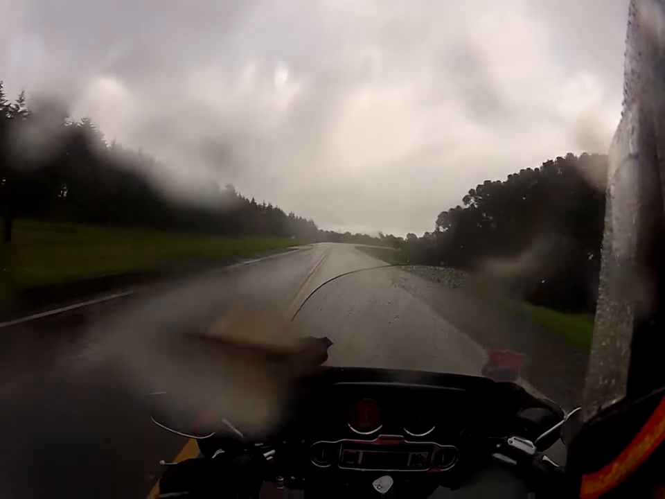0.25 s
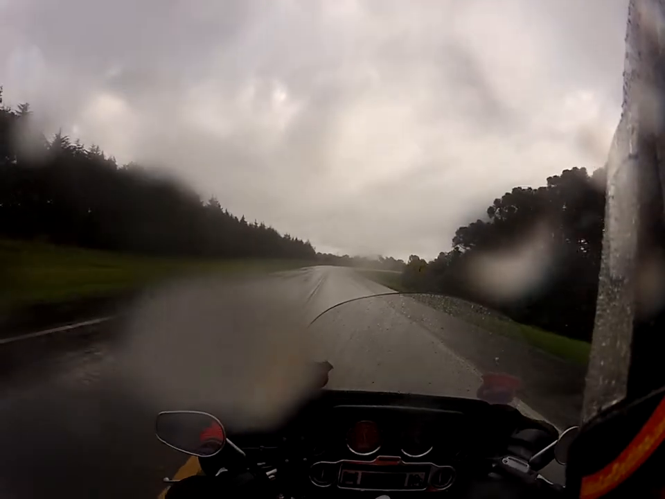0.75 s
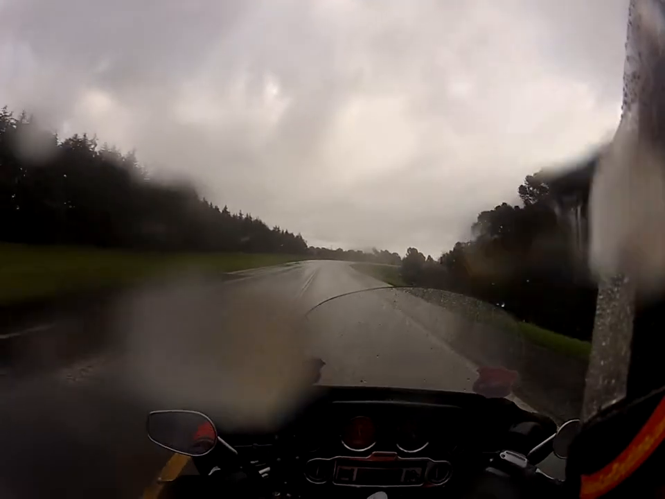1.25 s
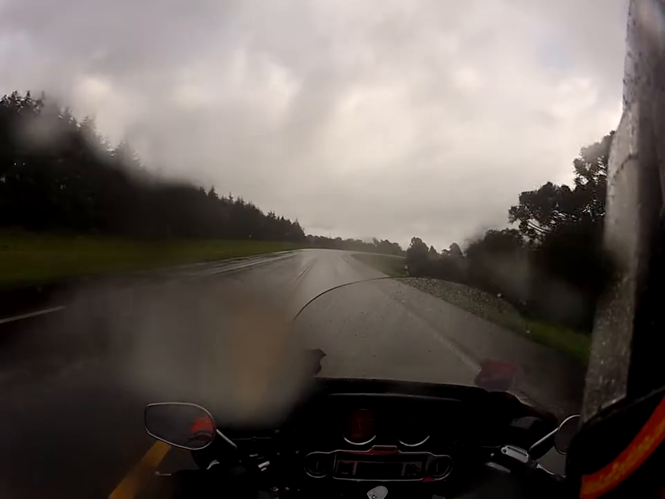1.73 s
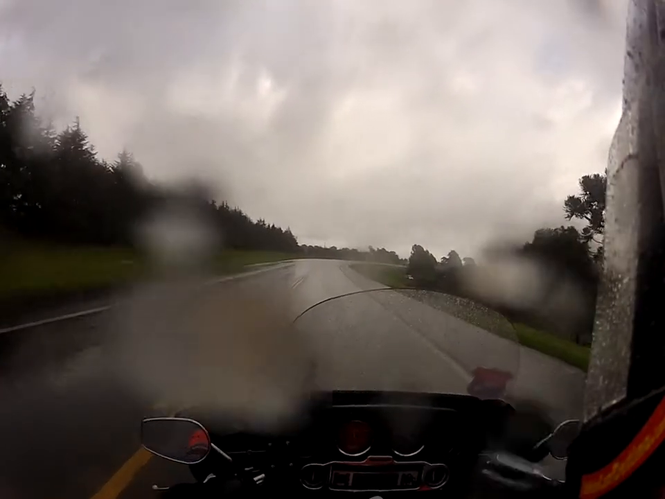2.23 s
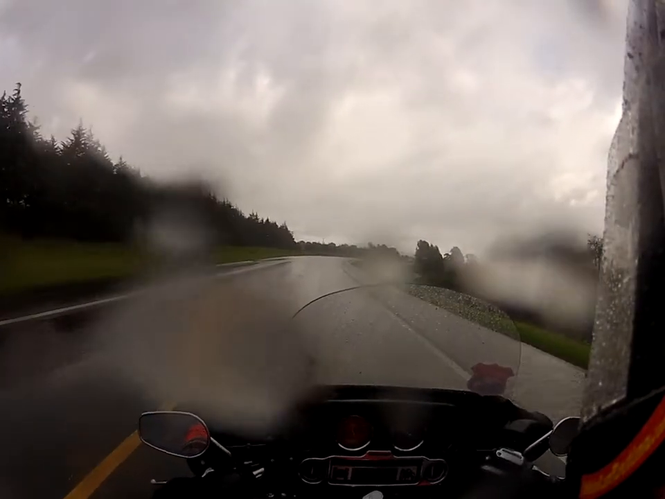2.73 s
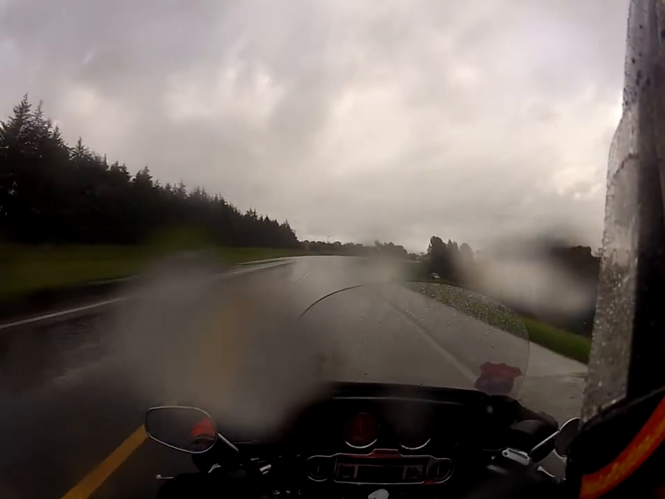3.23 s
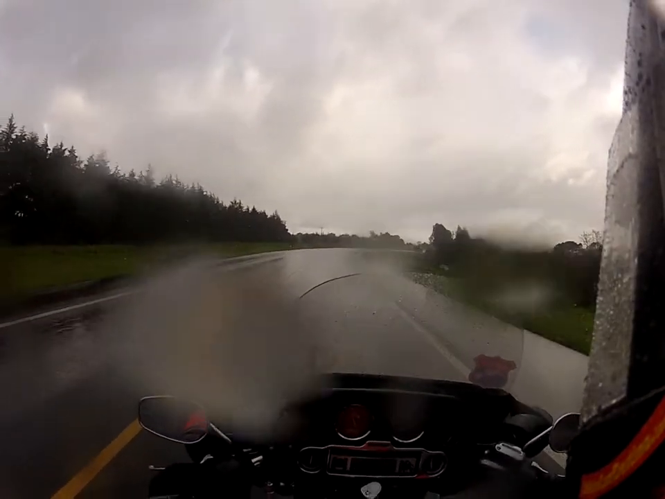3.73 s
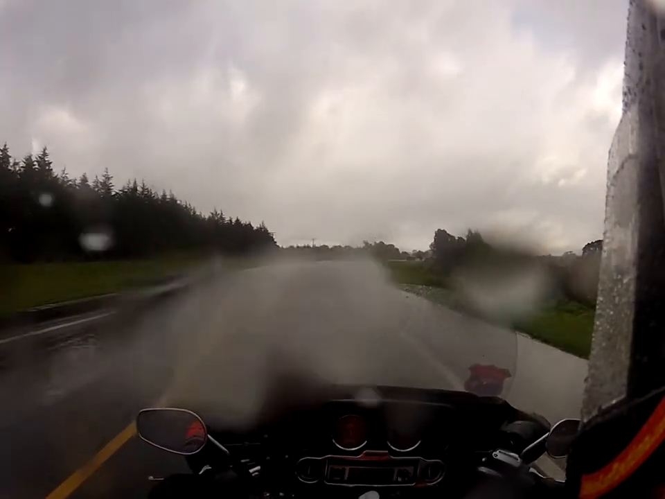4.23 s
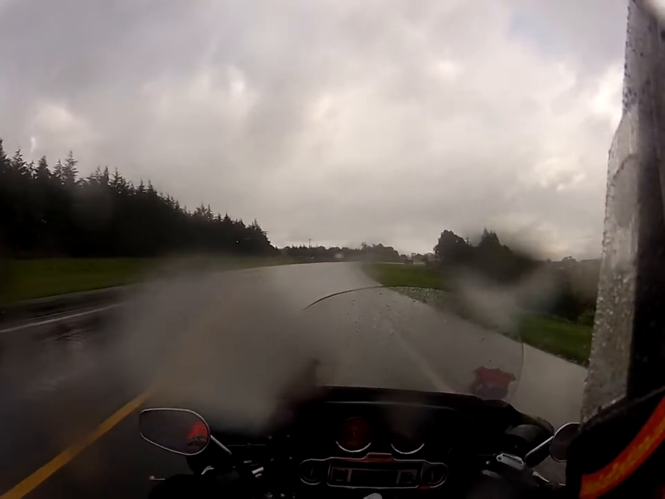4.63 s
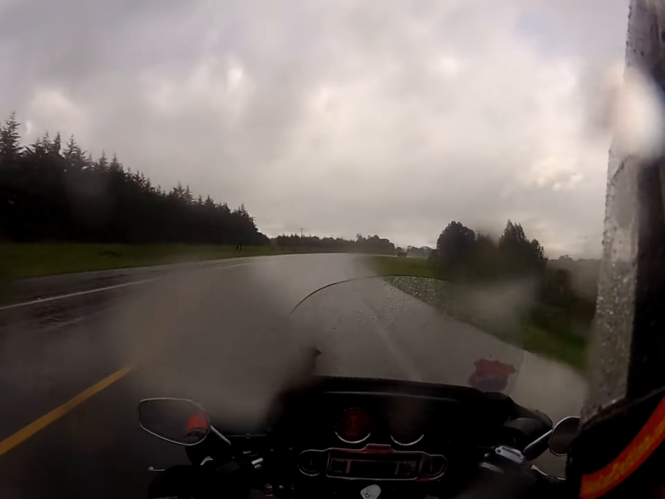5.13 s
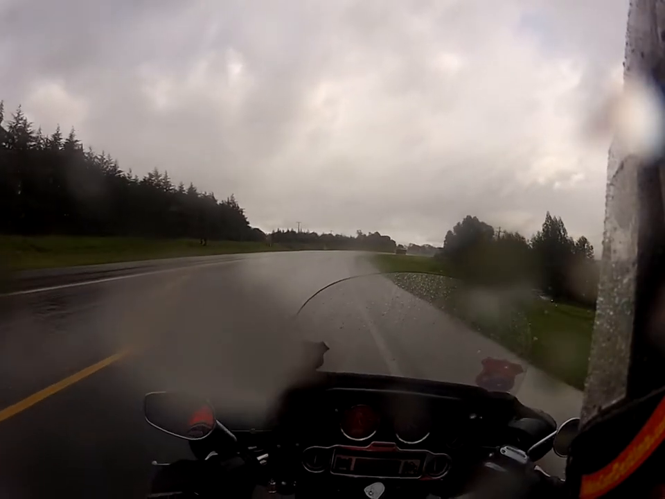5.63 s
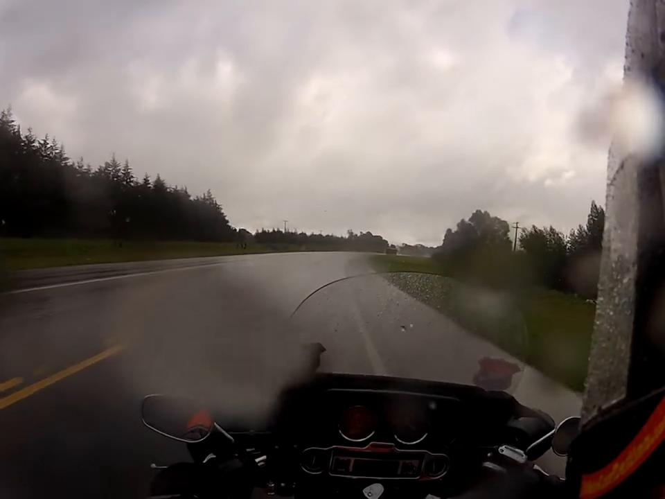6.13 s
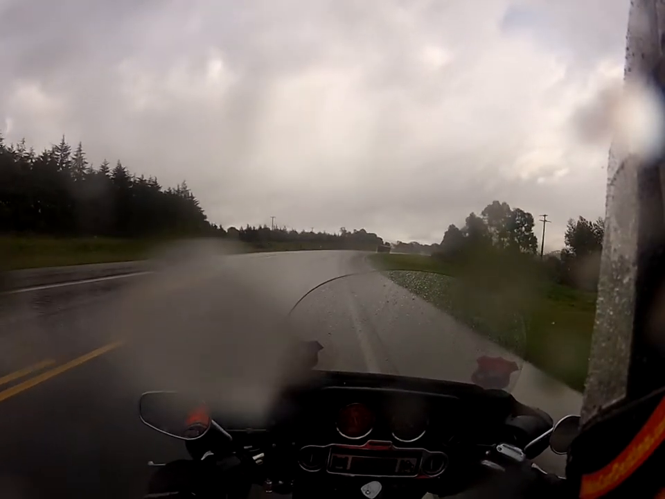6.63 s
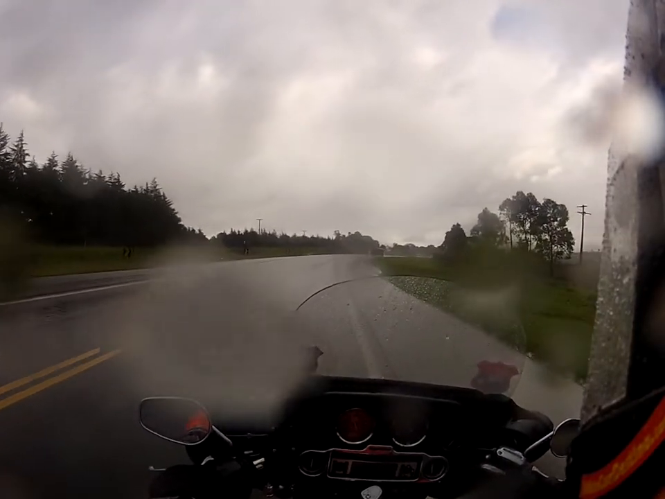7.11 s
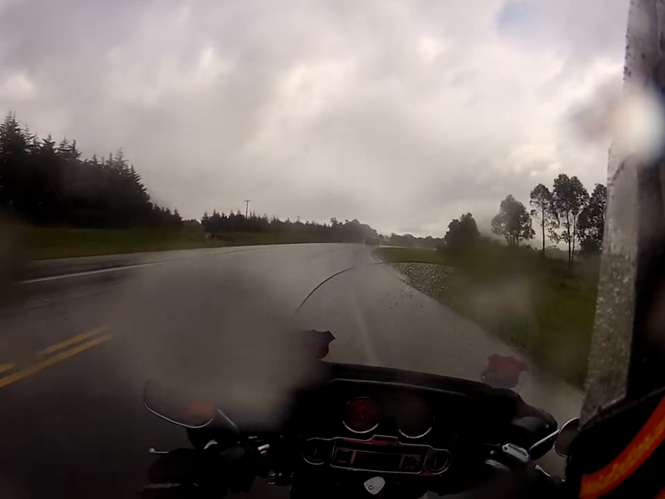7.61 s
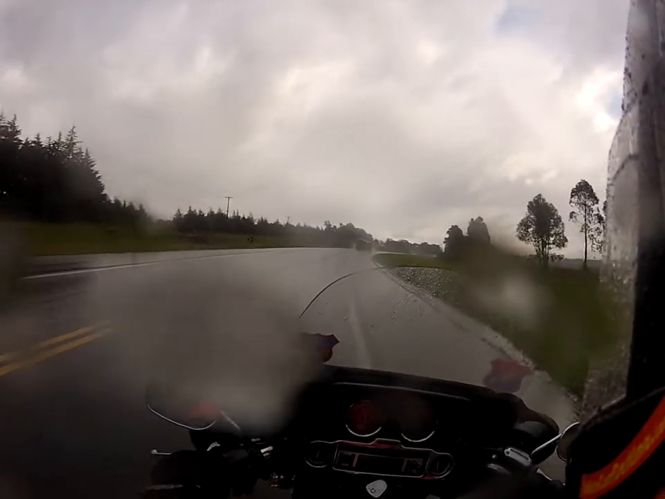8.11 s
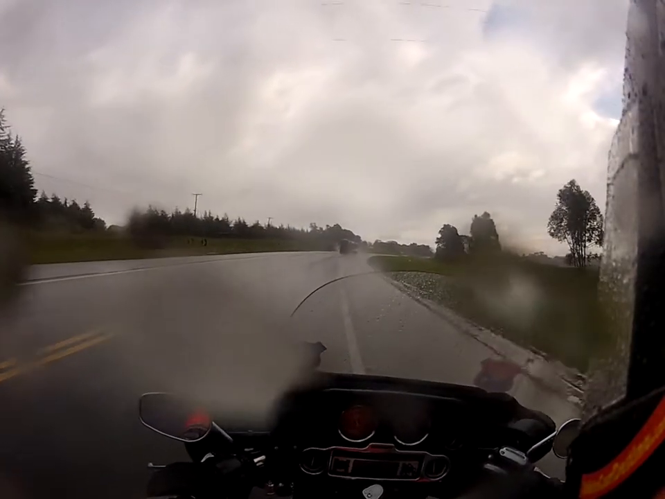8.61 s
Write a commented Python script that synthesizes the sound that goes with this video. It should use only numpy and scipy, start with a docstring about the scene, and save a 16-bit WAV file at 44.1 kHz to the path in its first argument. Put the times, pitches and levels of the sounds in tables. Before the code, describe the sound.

Large raindrops crack and knock sharply on a small plastic case over a low throbbing wind, deep motorcycle hum and faint wet hiss.

```python
"""Inside a small sealed camera case on a helmet: a twin-cylinder motorcycle at road speed in rain.
Wind buffets the case with a low wandering sine, rough noise and short slaps; the engine hums in half orders.
Large raindrops crack, thud, knock and splash on the plastic shell, over a patter of small drops and tyre spray.
The recorder ducks after hard hits, rounds off loud peaks and holds each sample of a 12 kHz stream,
which mirrors the sound in the treble."""
import sys
import numpy as np
from scipy import signal
from scipy.io import wavfile

SR = 44100
rng = np.random.default_rng(int(sys.argv[2]) if len(sys.argv) > 2 else 0)


def store_pcm(level_fs):
    """Save levels as 16-bit WAV."""
    pcm = np.round(np.clip(level_fs, -1, 1) * 32767).astype(np.int16)
    wavfile.write(sys.argv[1], SR, np.atleast_2d(pcm).T)


N = 390726   # length in samples
WIND_DB = -29.5   # steady wind past the case
# Short gusts of wind: time_s [s], rise_db [dB over the steady wind]
SHORT_GUSTS = [(.529, 7), (2.508, 4.5), (3.12, 2.5), (3.698, 6), (3.94, 4.5)]


def from_db(db):
    """Turn decibels into a gain."""
    return 10 ** (np.asarray(db) / 20)


def rms_one(x):
    """Scale a sound to an rms (average strength) of 1."""
    return x / np.sqrt(np.mean(x ** 2) + 1e-20)


def peak_one(x):
    """Scale a sound to a peak of 1."""
    return x / np.abs(x).max()


def in_time(rows):
    """Draw each column of a curve as straight lines between its points, one value a sample."""
    time_s, *columns = np.transpose(rows)
    return [np.interp(np.arange(N) / SR, time_s, column) for column in columns]


def drift(rate_hz):
    """Slow random wandering of spread 1: noise at 1/40 of the sample rate, smoothed twice."""
    pole = np.exp(-80 * np.pi * rate_hz / SR)
    sparse = rng.standard_normal(N // 40 + 2002)
    slow = signal.lfilter([1], [1, -2 * pole, pole * pole], sparse)[2000:]   # skip the filter's start
    return np.interp(np.arange(N) / 40, np.arange(len(slow)), rms_one(slow))


def resonance(x, hz, width_hz):
    """Ring at one pitch: a two-pole band-pass with gain 1 on top."""
    pole = np.exp(-np.pi * width_hz / SR)
    top = np.array([1, 0, -1]) * (1 - pole * pole) / 2
    bottom = [1, -2 * pole * np.cos(2 * np.pi * hz / SR), pole * pole]
    return signal.lfilter(top, bottom, x + 1e-18)   # the tiny offset avoids vanishingly small numbers


def banded_noise(spectrum, patchy_db, gust_hz, flicker_hz):
    """Third-octave bands of noise, each with its level, a shared gust and its own flicker; rms 1."""
    hz, db = np.transpose(spectrum)
    octaves = np.log2(hz[-1] / hz[0])
    edges = hz[0] * 2 ** np.arange(0, octaves + 1 / 3, 1 / 3)
    out, gust = 0, drift(gust_hz)
    white = rng.standard_normal((2, N))   # neighbouring bands use different noise
    for k, (low, high) in enumerate(zip(edges, edges[1:])):
        band_filter = signal.butter(2, [low, high], "band", fs=SR, output="sos")
        band = signal.sosfilt(band_filter, white[k % 2])
        level_db = np.interp(np.log(low * high) / 2, np.log(hz), db)
        out = out + band * from_db(level_db + patchy_db * (gust + 0.99 * drift(flicker_hz)))
    return rms_one(out)


def buffet():
    """Vortices shed off the helmet at a wandering rate, over lumpy wind noise with a few short gusts."""
    # Strength of the throb: time_s [s], level_db [dB]
    throb_curve = [(0, -17.5), (.15, -21), (.32, -30.5), (.6, -13), (.78, -17.5), (1.3, -18), (1.85, -18.5),
                   (2.4, -19.5), (2.67, -11.5), (2.82, -26), (3, -19.5), (4.82, -24), (5.03, -15),
                   (5.22, -35), (5.4, -21.5), (6.85, -25), (7.26, -17), (7.35, -32), (7.85, -16.5),
                   (8.45, -15.5), (8.59, -30), (8.68, -16), (8.86, -41)]
    # Colour of the wind noise: pitch_hz [Hz], level_db [dB per Hz]
    wind_colour = [(24, -11.5), (50, 0), (80, -7.5), (155, -14), (340, -23.5), (430, -23), (600, -40.5),
                   (900, -35)]
    throb_hz = 32.9   # mean shedding rate of the helmet wake
    ragged_db, ragged_width_hz = -6.5, 14.7   # unsteady part of the wake, under the throb
    gust_s = 0.029   # how long a gust swells and fades

    phase = 2 * np.pi * np.cumsum(throb_hz + 2.2 * drift(3.44)) / SR
    steady = np.sqrt(2) * np.sin(phase)   # rms 1
    rough = resonance(rng.standard_normal(N), throb_hz, ragged_width_hz)
    ragged = rms_one(resonance(rough, throb_hz, ragged_width_hz))
    throb_db = in_time(throb_curve)[0] + 2.6 * drift(4.8)
    throb = from_db(throb_db) * (steady + from_db(ragged_db) * ragged)

    t = np.arange(N) / SR
    rises_db = sum(rise_db * np.exp(-((t - s) / gust_s) ** 2) for s, rise_db in SHORT_GUSTS)
    gust_db = WIND_DB + rises_db
    wind = from_db(gust_db) * banded_noise(wind_colour, patchy_db=1.17, gust_hz=25, flicker_hz=9.1)
    low_cut = signal.butter(4, 19, "high", fs=SR, output="sos")
    return throb + thumps(gust_db) + signal.sosfilt(low_cut, wind)


def thumps(gust_db):
    """Single eddies slap the case: short soft pushes, more of them in gusts."""
    thump_db, thumps_per_s = -14.5, 14   # level against the wind; rate in steady wind
    born = rng.random(N) < thumps_per_s * from_db(gust_db - WIND_DB) / SR
    sizes = from_db(4.0 * np.minimum(rng.exponential(1, N), 3))
    pushes = born * sizes * rng.choice([-1, 1], N)
    pushes[[round(s * SR) for s, _ in SHORT_GUSTS]] = from_db(11.5)   # a hard slap at the middle of each gust
    soft = signal.butter(2, [70, 330], "band", fs=SR, output="sos")
    return from_db(gust_db + thump_db) * rms_one(signal.sosfilt(soft, pushes + 1e-18))


def engine():
    """Uneven firing of the two cylinders gives every multiple of the cycle rate; each wavers a little."""
    # Engine speed and load: time_s [s], cycle_hz [cycles per s, one cycle is two crank turns], load_db [dB]
    speed_and_load = [(0, 22.27, -30), (1, 22.31, -30), (1.6, 21.65, -35.5), (3, 21.14, -32.5),
                      (3.6, 20.65, -38), (4.2, 20.41, -32.5), (6, 20.47, -29.5), (7, 20.92, -29),
                      (8.86, 21.24, -29)]
    # Strength of each tone: multiple [times the cycle rate], level_db [dB against the load level]
    orders = [(1, -6), (2, 0), (3, -6), (4, -6), (5, -1.5), (6, -14), (7, -5.5), (8, -15), (9, -14),
              (10, -19), (11, -15), (12, -18)]
    cycle_hz, load_db = in_time(speed_and_load)
    phase = 2 * np.pi * np.cumsum(cycle_hz) / SR
    starts = rng.uniform(0, 2 * np.pi, len(orders))
    hum = 0
    for (multiple, level_db), start in zip(orders, starts):
        hum = hum + from_db(level_db + 1.37 * drift(3.9)) * np.sin(multiple * phase + start)
    return from_db(load_db) * hum


def large_drops():
    """A drop cracks, thuds, knocks at the pitch of the spot it hits; its splash of noise rings the case."""
    # Large drops on the case: time_s [s], peak_db [dB], knock_hz [Hz], splash_db [dB over the knock]
    drops = [(0.0498, -6, 1320, 13), (0.0869, -7, 2030, 15), (0.099, 4.5, 2030, -9),
             (0.1158, -1, 1720.0, 1), (0.1823, -16.5, 1710, -6), (0.2465, -11.5, 2440, -2),
             (0.276, -11, 2320, 8), (0.3275, -3.5, 2200, -16), (0.4587, -7.5, 2300, 5),
             (0.5085, -11, 2200, -1), (0.527, -11, 830, -7), (0.551, -2.5, 2060, 5),
             (0.597, -8.5, 1500, -4), (0.657, -8.5, 2500, -2), (0.7064, -4, 2350, -10),
             (0.7734, -0.5, 2320, 8), (0.794, 2, 1950, -1), (0.8236, -4, 2020.0, 4), (0.8815, -8, 1680, 13),
             (1.1038, -8, 2280, -2), (1.1773, -9, 2350.0, 7), (1.2151, 0.5, 2035, 6), (1.22, 10, 2016, -24),
             (1.3483, -8.5, 2207, -7), (1.383, -5.5, 1610, 0), (1.4763, 4.5, 2040, -22),
             (1.5676, 2.5, 1980, -1), (1.62, -6, 1320, 3), (1.7857, -7, 2190, -12),
             (1.8063, -9.5, 2440, 20), (1.9078, -5, 2350, 28), (2.0147, -6, 1312, 6),
             (2.083, -5, 2120, -11), (2.0906, -4.5, 2420, -2), (2.1108, -6, 1880, 10),
             (2.2085, -10, 2070, 17), (2.2279, -3.5, 2500, 2), (2.368, -12.0, 2280, 13),
             (2.5418, -4, 2070, -17), (2.7305, -9.5, 2290, -10), (2.7725, -7.5, 2100, -9),
             (2.791, 10.5, 2050, -6.5), (2.8905, 2.5, 2620, 11), (3.0058, -8, 1740, -7),
             (3.0455, -5, 2440, 13), (3.0725, -12, 2400, 10), (3.144, -10.5, 1870, 3),
             (3.1533, -7, 1980, 6), (3.2532, 9.5, 2016, -8), (3.3086, -10, 2350, -5),
             (3.3385, -7.5, 1940, 10), (3.392, -3, 2200, -1), (3.4223, -0.5, 2500, 7),
             (3.5996, -1, 2500, 18), (3.731, -3, 1230, 12), (3.854, -8, 2356, 7), (4.15, -1, 2180, -29),
             (4.3248, -7.5, 2190, 4), (4.4211, -3, 2105, -3), (4.55, -3, 1297, 3), (4.575, -5, 2130, -9),
             (4.6033, -1, 2580, 6), (4.6577, -8.5, 2200, -9), (5.0562, -5.5, 1327, 20),
             (5.1905, -8, 2500.0, 11), (5.3442, -7, 2018, -14), (5.5646, -7, 1630, -8),
             (5.7197, -19, 2300, 6), (5.8074, -10, 2400, 12), (5.8449, -12, 2090, -2),
             (5.931, -7, 2460, -5.5), (5.9505, -7, 2250, -3), (5.9577, -4, 2300, -6), (6.024, -13, 2000, 2),
             (6.045, -11, 2300, 0), (6.1793, -5, 2050.0, 8), (6.4343, -9.5, 2043, -16),
             (6.4644, -7, 1960, -6), (6.5483, -7, 1190, 19), (6.8596, -7, 1740, -9),
             (7.1705, -7, 2056, -13), (7.1797, -8, 1980, -4), (7.337, -3.5, 2500, 0),
             (7.3555, -11, 2100, 2), (7.3981, 0, 2435, 15), (7.4264, 3.5, 2020, 5), (7.5938, -8, 1246, 5),
             (7.718, 0.5, 1915, -5), (7.7847, -12.5, 1116, 5), (8.046, -1.5, 1980.0, 3.5),
             (8.4443, -4.5, 2120, 2)]
    # t60 is the time to fade by 60 dB
    crack_db, crack_t60_s = 1.5, .0015   # first contact, over knock and splash together
    thud_db, thud_hz, thud_t60_s = -18, 425, 0.016   # whole case gives; the highest thud pitch
    splash_t60_s, splash_swell_s = 0.0089, 0.00073   # the shortest splash, before the heavy part
    knock_t60_s, knock_swell_s = 0.0042, 0.0009
    heavy_t60_s = 0.0037   # added for a drop of 0 dB; heavy drops ring longer
    tail_db, tail_t60_s = -5, 0.017   # droplets thrown off by the splash

    length = 2048   # samples in one tick
    out, t = np.zeros(N + length), np.arange(length) / SR
    splats = rng.standard_normal((len(drops), length))
    spreads = rng.uniform(1.0, 2.33, len(drops))   # longer splash, lower thud
    for (s, peak_db, knock_hz, splash_db), noise, spread in zip(drops, splats, spreads):
        heavy_s = heavy_t60_s * from_db(peak_db)
        main_fade = from_db(-60 * t / (splash_t60_s * spread + heavy_s))
        tail = from_db(tail_db - 60 * t / tail_t60_s)
        splash = noise * np.minimum(t / splash_swell_s, 1) * (main_fade + tail)
        case = shell(splash) + 0.061 * np.diff(splash, prepend=0)   # ring plus direct bright sound

        knock_fade = from_db(-60 * t / (knock_t60_s + heavy_s))
        knock = np.sin(2 * np.pi * knock_hz * t) * np.minimum(t / knock_swell_s, 1) * knock_fade
        contact = noise * from_db(-60 * t / crack_t60_s)
        crack = shell(contact) + 0.17 * np.diff(contact, prepend=0)
        thud = np.sin(2 * np.pi * thud_hz / spread * t) * from_db(thud_db - 60 * t / thud_t60_s)

        body = peak_one(peak_one(knock) + from_db(splash_db) * peak_one(case))
        tick = body + from_db(crack_db) * peak_one(crack) + thud
        at = round(s * SR)
        out[at:at + length] += from_db(peak_db) * peak_one(tick)
    return out[:N]


def shell(x):
    """The plastic case rings at several pitches side by side, with alternating sign."""
    # Ringing modes of the case: pitch_hz [Hz], width_hz [Hz], level_db [dB]
    modes = [(1172, 127, -6), (1650, 424, -4.5), (2070, 790, -1.5), (2500, 1170, -4), (3660, 165, -3.5),
             (4270, 1350, -14.5), (5730, 670, -16.5)]
    ringing = 0
    for k, (hz, width_hz, level_db) in enumerate(modes):
        ringing = ringing + (-1) ** k * from_db(level_db) * resonance(x, hz, width_hz)
    return ringing


def patter(per_s):
    """Small drops at random, most faint: each swells and dies in milliseconds and rings its own spot."""
    sizes = from_db(8.8 * np.minimum(rng.exponential(1, N), 2.5))
    born = rng.random(N) < per_s * from_db(1.5 * drift(12)) / SR
    fade = from_db(-60 / (0.0037 * SR))   # 60 dB in 3.7 ms, used twice to give a swell
    dealt = rng.integers(0, 12, N)   # which of 12 spots a drop hits
    noise = rng.standard_normal(N)
    spots = 0
    for k, hz in enumerate(np.geomspace(1100, 4800, 12)):
        hits = sizes * born * (dealt == k)
        splat = noise * signal.lfilter([1], [1, -2 * fade, fade ** 2], hits + 1e-18)
        spots = spots + resonance(splat, hz, 630) + 0.9 * splat
    return from_db(-35) * rms_one(shell(spots))


def spray(level_db):
    """Tyre spray hisses as bands of noise that flicker quickly."""
    # Colour of the hiss: pitch_hz [Hz], level_db [dB per Hz]
    spray_colour = [(600, -5.5), (880, -10.5), (1150, -1), (1400, -6.5), (2300, 0), (2900, -10.5),
                    (3600, -7), (4260, -17), (5160, -11.5), (5900, -18)]
    return from_db(level_db) * banded_noise(spray_colour, patchy_db=2.3, gust_hz=109, flicker_hz=39.0)


def scene():
    """Add all sources into one channel."""
    # Rain and wet road: time_s [s], drops_per_s [small drops per s], spray_db [dB]
    rain_curve = [(0, 180, -34), (3, 77, -34.5), (8.86, 74, -35)]
    drops_per_s, spray_db = in_time(rain_curve)
    return (buffet() + engine() + large_drops() + patter(drops_per_s) + spray(spray_db))[None]


def record(dry):
    """Gain control that hears hits but not the low throb, overload, a held 12 kHz stream, the top cut."""
    duck_from_db, duck_slope, recover_db_per_s = -5, 3.7, 131   # slope: dB of ducking per dB too loud
    smooth_hz, cutoff_hz = 5550, 15450   # low-pass before the hold, and after it

    sharp = signal.sosfilt(signal.butter(2, 300, "high", fs=SR, output="sos"), dry)
    power = signal.lfilter([.012], [1, -.988], sharp ** 2)   # short running average
    power_db = 10 * np.log10(power + 1e-12)
    duck_db = np.clip(duck_slope * (power_db - duck_from_db), 0, 13)
    ramp = recover_db_per_s * np.arange(N) / SR
    # the gain drops at once and recovers at a steady rate
    duck_db = np.maximum.accumulate(duck_db + ramp, axis=1) - ramp
    late = np.pad(duck_db, ((0, 0), (120, 0)))[:, :N]   # the control answers about 3 ms late
    ducked = dry * from_db(-late)

    loud = ducked / (1 + (ducked / .74) ** 4) ** .25   # peaks bend towards a ceiling of 0.74
    smooth = signal.sosfilt(signal.cheby1(6, .5, smooth_hz, fs=SR, output="sos"), loud)
    stream = signal.resample_poly(smooth, 40, 147, axis=1)   # 44.1 kHz to 12 kHz
    held = np.repeat(stream, 4, axis=1)   # four equal samples each, at 48 kHz
    wet = signal.resample_poly(held, 147, 160, axis=1)[:, :N]   # back to 44.1 kHz
    return signal.sosfilt(signal.ellip(12, .5, 100, cutoff_hz, fs=SR, output="sos"), wet)


dry = scene()
out = record(dry)
store_pcm(out)
```